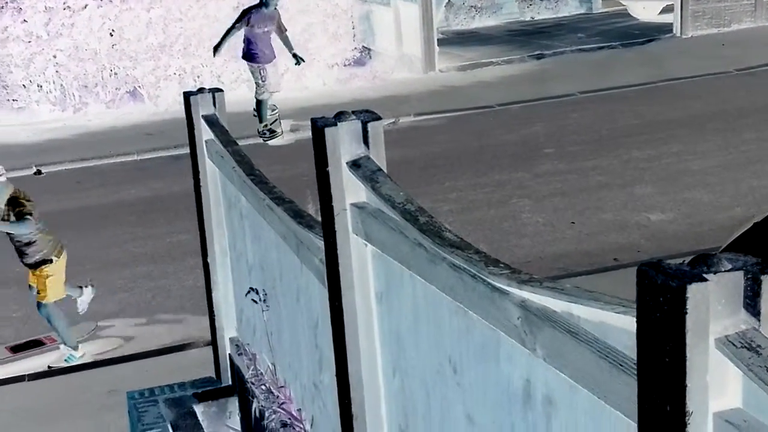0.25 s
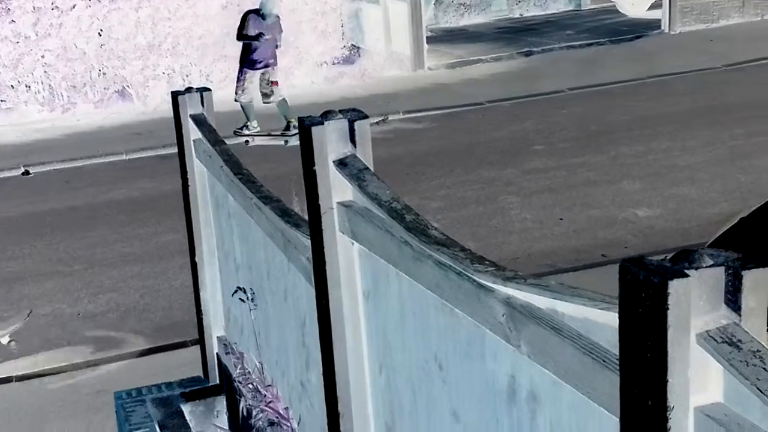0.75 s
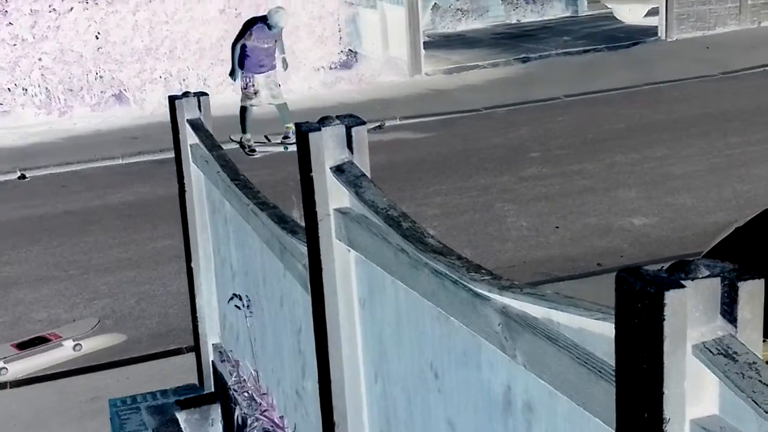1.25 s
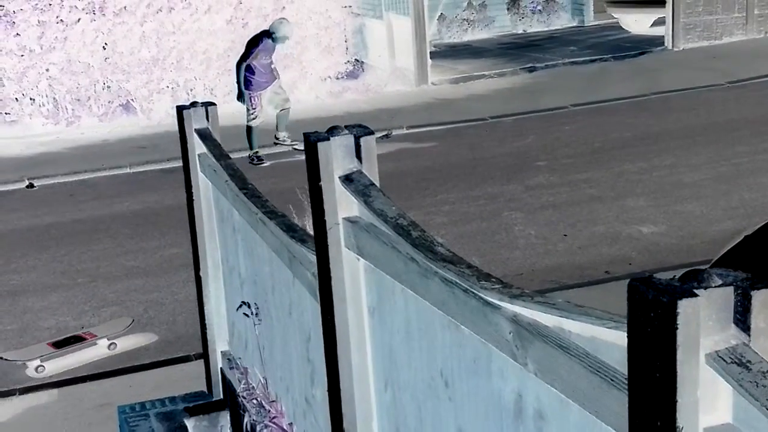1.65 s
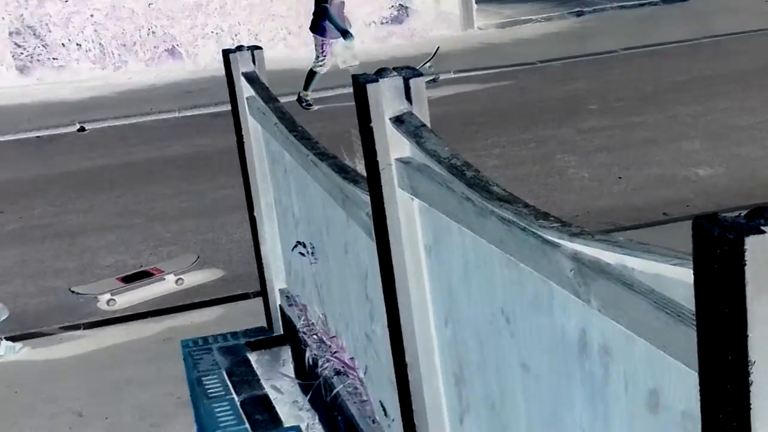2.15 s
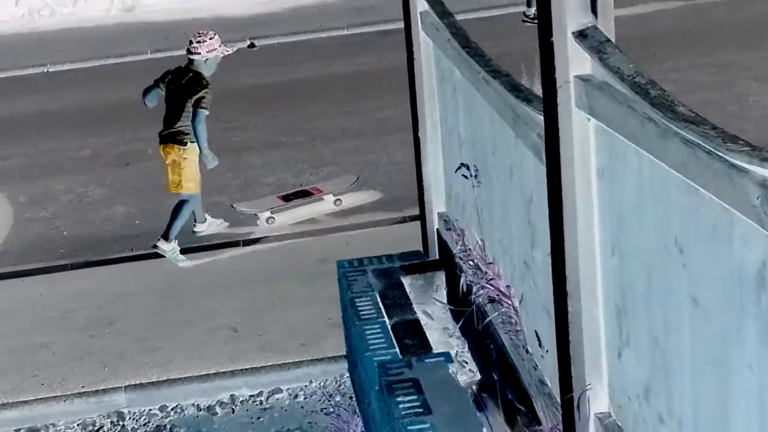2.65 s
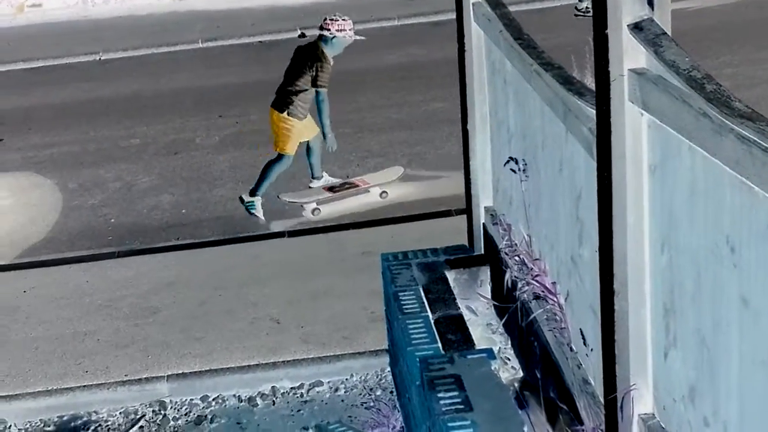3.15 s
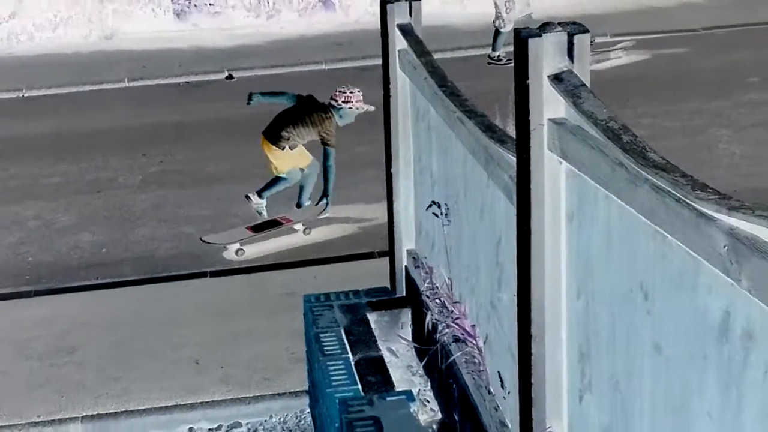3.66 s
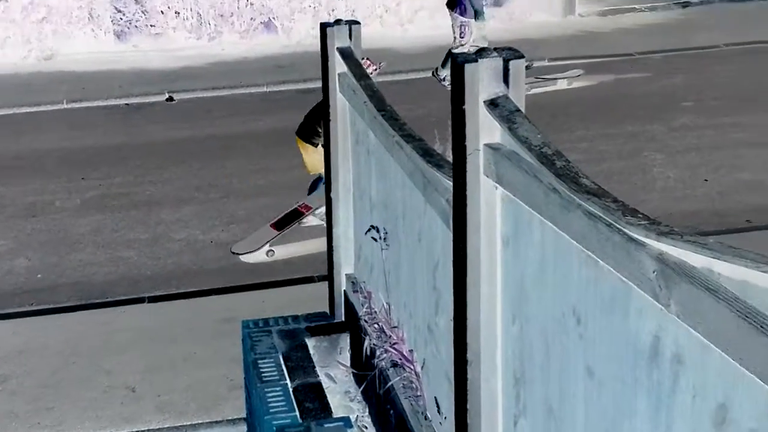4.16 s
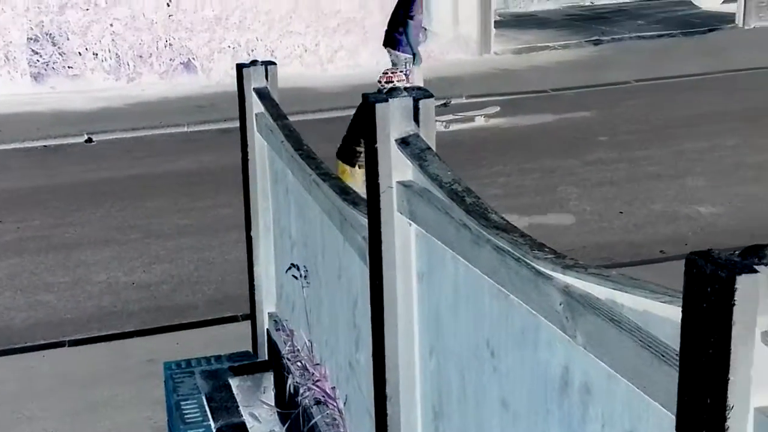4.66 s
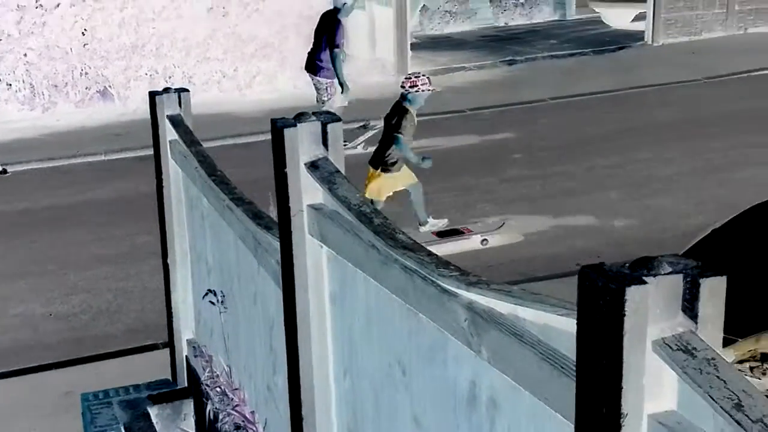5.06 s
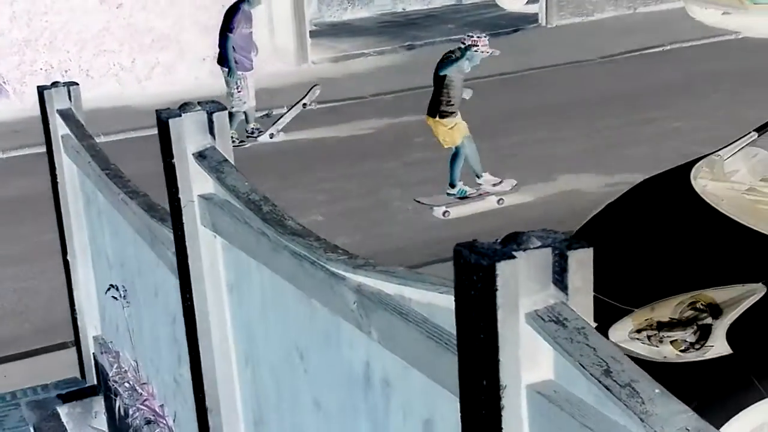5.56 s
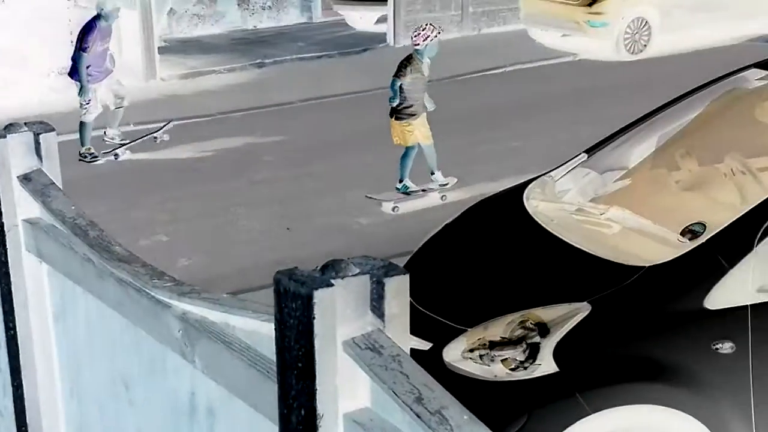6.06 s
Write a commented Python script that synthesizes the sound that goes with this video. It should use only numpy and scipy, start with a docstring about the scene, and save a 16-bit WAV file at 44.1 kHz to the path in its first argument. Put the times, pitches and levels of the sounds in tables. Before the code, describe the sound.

Skateboard wheels rumble and hiss over gritty asphalt with a brief chirping skid, hard board slams, wooden clacks, then more rolling and a final bright slam.

```python
"""Wheels rumble and hiss over grit in a quiet suburban hum; soon come knocks, a chirp and hard slams.
Two skateboards are on an asphalt street, heard from behind a garden fence a few metres away.
Rough contacts are bursts of shaped noise; boards ring as sets of fading tones, struck by tiny taps.
Chirps are wavering tones on a stuttering rasp; hum and drone are filtered noise.
The fence and the house fronts throw every sound but the hum and the dull thumps back as echoes."""
import sys
import numpy as np
from scipy import signal
from scipy.fft import rfft, irfft
from scipy.io import wavfile
from scipy.ndimage import uniform_filter1d

SR = 44100
rng = np.random.default_rng(int(sys.argv[2]) if len(sys.argv) > 2 else 0)


def store_pcm(level_fs):
    """Save levels as 16-bit WAV."""
    pcm = np.round(np.clip(level_fs, -1, 1) * 32767).astype(np.int16)
    wavfile.write(sys.argv[1], SR, np.atleast_2d(pcm).T)


N = 278271  # length in samples
T = np.arange(N) / SR  # time in seconds
BLOW_T = T[:SR // 3]  # time within one blow


def undb(db):
    """Turn decibels into a gain."""
    return 10 ** (np.asarray(db) / 20)


def unit(x):
    """Scale a steady sound to an rms (average strength) of 1."""
    return x / np.sqrt(np.mean(x ** 2))


def unit_blow(x):
    """Scale a blow to the energy of a fiftieth of a second at rms 1."""
    return x / np.sqrt(np.sum(x ** 2) * 50 / SR)


def add(track, s, x):
    """Mix x into the track from time s, in seconds."""
    start = int(s * SR)
    part = x[:max(N - start, 0)]
    track[start:start + len(part)] += part


def low_cut(x, hz):
    """Small bodies radiate little below hz."""
    return signal.sosfilt(signal.butter(3, hz, "high", fs=SR, output="sos"), x)


def colour(x, points, treble_db=0, bass_db=0, treble_hz=2800, bass_hz=520):
    """Filter through (f/Hz, level/dB) points, then lift or cut treble and bass; nothing sounds early."""
    size = 4096
    f = np.maximum(np.arange(size // 2 + 1) * SR / size, 1)
    hz, level_db = np.transpose(points)
    db = np.interp(np.log(f), np.log(hz), level_db)
    db = db + treble_db / (1 + (treble_hz / f) ** 4)
    db = db + bass_db / (1 + (f / bass_hz) ** 4)
    # folding the cepstrum puts the filter's energy as early as it can be
    cepstrum = irfft(np.log(undb(db)))[:size // 2]
    cepstrum[1:] *= 2
    response = irfft(np.exp(rfft(cepstrum, size)))
    return signal.fftconvolve(x, response)[:len(x)]


def walk(rate, count=N):
    """Wander smoothly towards a new chance value rate times a second; spread near 1."""
    hold = max(int(SR / rate), 1)
    steps = np.repeat(rng.standard_normal(count // hold + 1), hold)
    return np.sqrt(2) * uniform_filter1d(steps, hold)[:count]


def grit(count, spread_db):
    """Dense tiny impacts, a few of them much larger than the rest."""
    size_db = spread_db * np.minimum(rng.exponential(size=count), 6)
    return unit(rng.standard_normal(count) * undb(size_db))


def contact(rise, fall, spread_db):
    """Chatter of two rough surfaces that builds up and dies away."""
    build = np.minimum(BLOW_T / rise, 1)
    die_away = np.exp(-np.maximum(BLOW_T - rise, 0) / fall)
    return build * die_away * grit(len(BLOW_T), spread_db)


def drive(force, response):
    """What a body with this response gives out under the force."""
    return signal.fftconvolve(force, response)[:len(force)]


TAPS_PER_S = 620  # average rate of the tiny collisions within a blow


def taps(rise, fall):
    """A first touch, then tiny collisions at uneven gaps that die away."""
    happens = rng.random(len(BLOW_T)) < TAPS_PER_S / SR
    hits = contact(rise, fall, spread_db=1.5) * happens
    return np.r_[1, hits[1:]]


def ring(hz, t60):
    """One pure tone that fades by 60 dB in t60 seconds."""
    return np.sin(2 * np.pi * hz * BLOW_T) * np.exp(-np.log(1000) * BLOW_T / t60)


# no two blows meet the board at the same place or under the same load
PLACE_DB, LOAD_SHARE = 2.5, 0.02  # spread of each tone's level in dB, and of its pitch as a share


def modes(table, damping):
    """A board's own tones, weighted by where it is struck, detuned and damped by the rider's feet."""
    out = 0
    for hz, db, t60 in table:
        side, place, load = rng.standard_normal(3)
        tone = ring(hz * (1 + LOAD_SHARE * load), t60 / damping)
        out = out + np.sign(side) * undb(db + PLACE_DB * place) * tone
    return out


# low drone of distant traffic over time: (t/s, level/dB)
DRONE_LEVEL = [(0, -64), (1.3, -86), (1.7, -59), (2.6, -58), (3.3, -60), (3.9, -74), (6.31, -86)]
# tone colour of the drone: (f/Hz, level/dB)
DRONE_COLOUR = [(30, -29), (60, -14), (100, -2), (160, 2), (260, -16), (800, -59)]
# tone colour of the hum and faint hiss: (f/Hz, level/dB)
SUBURB_COLOUR = [(25, -26), (50, -17), (80, -14), (115, -7.5), (165, 1.5), (270, 3), (450, -7.5),
                 (1000, -7.5), (2500, -19.5), (6000, -27.5), (13500, -23.5), (15000, -36)]
SUBURB_DB = -52.4


def suburb():
    """Distant traffic and faint hiss, slowly swelling; a low drone comes and goes."""
    drone = unit(colour(rng.standard_normal(N), DRONE_COLOUR))
    drone_db = np.interp(T, *np.transpose(DRONE_LEVEL))
    hum = unit(colour(rng.standard_normal(N), SUBURB_COLOUR))
    hum_db = SUBURB_DB + 0.5 * walk(3.7)
    return undb(drone_db) * drone + undb(hum_db) * hum


# tones of the plywood deck with its metal trucks, before chance and damping: (f/Hz, level/dB, t60/s)
DECK = [(238, -6, 0.061), (300.7, 0.5, 0.35), (514, 10, 0.18), (590, -28, 0.059), (677, 12.5, 0.1),
        (825, 20.5, 0.072), (925, 9.5, 0.29), (987, -19, 0.22), (1120, -30, 0.095), (1224, 5.5, 0.4),
        (1394, 5.5, 0.28), (1484, 16.5, 0.061), (1730, -17, 0.15), (1870, 4.5, 0.38), (2178, 17.5, 0.076),
        (2290, 12.5, 0.15), (2820, -29, 0.085), (2960, -7, 0.055), (3300, -32.5, 0.089), (3630, -3, .10),
        (4030, 19, 0.015), (4130, -29, 0.11), (4530, -17, 0.082), (4900, 3, 0.19)]
STONES_PER_S = 110  # for each wheel


def stones():
    """Coarser stones knock the deck through one wheel."""
    hits = (rng.random(N) < STONES_PER_S / SR) * rng.uniform(-0.67, 1, N)
    through_wheel = [(150, -37.0), (240, -1.0), (320, 9), (600, 4.5), (1200, -11), (2000, -10.0), (4000, -6)]
    knock = colour(modes(DECK, damping=2.6), through_wheel)
    return unit(drive(hits, knock))


# tone colour of wheels on grit, before the bass and treble trims: (f/Hz, level/dB)
RUMBLE_COLOUR = [(59, -69), (100, -66), (147, -45), (177, -40), (237, -3), (269, -10.5), (318, -5),
                 (395, -6.5), (678, 2), (803, -1.5), (1010, -1), (1260, -10), (1940, -7), (2980, -12),
                 (4000, -16.5), (5200, -24), (8800, -120)]
PEBBLES_PER_S, PEBBLE_FALL_S = 65, 0.0023


def pebbles():
    """Small rattles at uneven gaps as the wheels hop over loose stones."""
    hops = (rng.random(N) < PEBBLES_PER_S / SR).astype(float)
    shake = drive(hops, np.exp(-BLOW_T / PEBBLE_FALL_S))
    return unit(colour(shake * grit(N, spread_db=2.0), RUMBLE_COLOUR, treble_db=-0.5, bass_db=-8.5))


# Ride levels, before the trims and the flutter: (t/s, rumble level/dB, hiss level/dB)
# the far rider, who coasts to a stop
FAR_RIDE = [(0, -30.5, -38), (0.2, -37, -46), (0.46, -30, -47.5), (0.68, -30.5, -55), (0.8, -39, -43.5),
            (0.91, -45, -52.5), (0.979, -24.5, -39), (1.2, -38, -45), (1.6, -37, -49), (1.9, -47.5, -64),
            (3.3, -54, -64.5)]
# the near board is stepped on, tipped up and dragged round
NEAR_TURN = [(3.3, -51, -63), (3.36, -29, -59), (3.46, -40.5, -62), (3.62, -36, -58), (3.82, -36.5, -54),
             (4.05, -35.5, -45), (4.28, -39.5, -44.5), (4.41, -47.5, -63)]
# the near rider pushes off
NEAR_RIDE = [(4.413, -33, -40.5), (4.55, -39.5, -44), (4.85, -35, -38.5), (5.0, -36, -42),
             (5.3, -37.5, -44), (5.44, -35, -43), (5.53, -30.5, -39), (5.59, -33.5, -43), (5.73, -37, -43),
             (5.81, -32, -37), (5.87, -31.5, -40), (5.96, -28.5, -36.5), (6.0, -31.5, -40),
             (6.12, -32, -40), (6.17, -40.5, -47.5), (6.23, -34.5, -46), (6.31, -37, -29)]
# tone colour of the hiss: (f/Hz, level/dB)
HISS_COLOUR = [(1760, -31), (3000, -26), (3800, -3.5), (4840, 4), (6080, -6), (9880, -11.5), (13000, -26.5),
               (15000, -53)]
RUMBLE_TRIM_DB, HISS_TRIM_DB = -6, -2
BOARD_DB, PEBBLE_DB = -7.0, -8.5  # against the tread
GRAINS_PER_S, GRAIN_S, GRAIN_DB = 110, 0.0011, -7.5  # sand cracking under the wheels; level against the grit


def wheels():
    """Asphalt grain shakes wheels and deck; the uneven road makes the rumble and hiss flutter."""
    s, *columns = np.transpose(FAR_RIDE + NEAR_TURN + NEAR_RIDE)
    rumble_db, hiss_db = (np.interp(T, s, column) for column in columns)
    road_db = 1.0 * walk(50) + 1.2 * walk(14)

    tread = colour(grit(N, spread_db=3.5), RUMBLE_COLOUR, treble_db=-5.0, bass_db=-1.5)
    tread = unit(low_cut(tread, hz=128))
    board = unit(sum(stones() for wheel in range(4)))
    rumble = tread + undb(BOARD_DB) * board + undb(PEBBLE_DB) * pebbles()
    rumble_db = rumble_db + RUMBLE_TRIM_DB + road_db + 1.0 * walk(140)

    grains = (rng.random(N) < GRAINS_PER_S / SR) * rng.exponential(size=N)
    sand = unit(drive(grains, np.exp(-BLOW_T / GRAIN_S)) * rng.standard_normal(N))
    hiss = unit(colour(grit(N, spread_db=3.5) + undb(GRAIN_DB) * sand, HISS_COLOUR))
    hiss_db = hiss_db + HISS_TRIM_DB + road_db + 0.89 * walk(180)
    return undb(rumble_db) * rumble + undb(hiss_db) * hiss


# tone colour of a dry crack on the road: (f/Hz, level/dB)
CRACK_COLOUR = [(35, -56), (100, -42), (230, -4), (420, -3.5), (600, 3.5), (1200, 0.5), (2000, 1),
                (2900, -4.5), (4600, -9), (6400, -19), (10000, -25.5), (15000, -76)]
TAP_S, RATTLE_S, RATTLE_DB = 0.00075, 0.088, -11  # fade of one tap, fade of the rattle, its level
CLUSTERS_PER_S, CLUSTER_DB = 265, 1.5  # the chatter of a blow comes in bunches
STRONG_T60_S, LINGER_T60_S, LINGER_DB = 0.044, 0.27, -18  # the strongest ring drops fast, then lingers


def blow(rise, fall, treble_db, bass_db, hz, ring_db):
    """A rattling crack, the ring of the whole board, and one tone that every tap strikes afresh."""
    # loose trucks and bearings chatter on after the blow itself
    rattle = drive(np.abs(taps(rise, RATTLE_S)) ** 1.08, np.exp(-BLOW_T / TAP_S))
    rattle = unit_blow(rattle * rng.standard_normal(len(BLOW_T)))
    bunches = undb(CLUSTER_DB * walk(CLUSTERS_PER_S, count=len(BLOW_T)))
    chatter = unit_blow(bunches * contact(rise, fall, spread_db=1.5))
    crack = unit_blow(colour(chatter + undb(RATTLE_DB) * rattle, CRACK_COLOUR))

    build = np.minimum(BLOW_T / rise, 1)
    body = unit_blow(low_cut(build * modes(DECK, damping=2.18), hz=178))
    # bare wood hits bright, a wheel or a sole hits dull
    flat = [(20, 0), (SR / 2, 0)]
    whole = unit_blow(colour(crack + undb(-3.0) * body, flat, treble_db, bass_db))

    tone = ring(hz, STRONG_T60_S) + undb(LINGER_DB) * ring(hz, LINGER_T60_S)
    strongest = build * drive(taps(rise, 0.77 * fall), tone)
    strongest = unit_blow(low_cut(strongest, hz=214))
    return unit_blow(whole + undb(ring_db) * strongest)


# trucks knocking as a foot lands or the weight shifts:
# (t/s, level/dB, die-away/s, brightness/dB, strongest ring f/Hz, ring level/dB)
KNOCKS = [(0.247, -32, 0.0041, -16, 830, 1.5), (0.543, -27, 0.0066, -5, 896, 1),
          (0.578, -27, 0.065, -12, 596, -28), (0.737, -23.5, 0.002, -13, 1450, 1),
          (0.7603, -23.5, 0.0037, -10, 1048, 6), (1.074, -20.5, 0.01, 2.5, 596, -10),
          (1.259, -29.5, 0.033, -6.5, 676, -23), (1.349, -37.5, 0.003, 4, 2320, 2),
          (1.414, -26.5, 0.015, 1.5, 1670, -4), (1.5169, -28, 0.018, 10, 2255, -11),
          (1.524, -27.5, 0.006, 2, 1480, -2), (1.62, -39.5, 0.017, -1, 640, -11),
          (1.708, -30.5, 0.029, -2, 1600, -7), (1.749, -32.5, 0.024, 2, 1285, -8),
          (2.675, -38.5, .008, -4, 876, 3), (3.334, -27, 0.024, -4, 880, -17),
          (3.37, -32.5, .014, -4.5, 1510, -7), (3.412, -41, 0.007, -8, 1730, -3),
          (3.502, -33, 0.053, 1, 1010, -14), (3.581, -25, 0.018, -7, 514, -9),
          (3.692, -25, 0.0034, 13, 1330, -3), (3.803, -31, 0.022, 4, 1830, -8),
          (3.881, -25, 0.025, 9.5, 2212, 0.5), (3.901, -36, 0.0058, 8, 2400, 2),
          (3.917, -36, 0.0048, 7, 1476, 5), (3.935, -33.5, 0.013, 4, 2140, 2),
          (4.114, -32.5, 0.06, -20, 434, -10), (4.219, -36.5, 0.043, -16, 447, 0),
          (4.266, -35.5, 0.016, -14, 605, 1), (4.358, -43.5, 0.0026, -8, 1800, -10),
          (4.4143, -34, 0.02, -16, 630, -16), (4.429, -28.5, 0.012, -14.5, 1020, -5),
          (4.483, -30.5, 0.026, -6, 1030, -7), (4.579, -32, 0.02, -14, 1090, -6),
          (4.707, -33, 0.0052, 3, 2060, 5), (4.751, -38, 0.017, -3, 1940, -7),
          (4.824, -24.5, 0.04, -2.5, 1160, -24), (4.895, -32.5, 0.022, -3, 590, -7),
          (5.019, -35.5, 0.0065, -3, 1800, -1), (5.075, -40.5, 0.01, -1, 1890, 2),
          (5.138, -36, 0.027, -7, 650, 5), (5.232, -39, 0.0079, -5, 785, 2),
          (5.304, -35.5, 0.016, 10, 1930, -2), (5.4992, -31.5, 0.007, -8, 900, 1),
          (5.524, -45, .015, -7, 800, -12), (5.7836, -34.5, 0.0016, -3, 790, -14),
          (5.812, -33, 0.013, -5, 1030, 6), (6.2541, -18.5, 0.0081, 34, 1854, 2.5)]
KNOCK_RISE_SHARE = 0.15  # build-up as a share of the die-away
KNOCK_BASS_DB, BASS_PER_BRIGHT = -2.5, 1  # bass at neutral brightness; dB lost per dB of brightness


def knocks():
    """Lighter blows: the longer ones build up more slowly, the duller ones carry more bass."""
    out = np.zeros(N)
    for s, db, fall, bright_db, hz, ring_db in KNOCKS:
        bass_db = KNOCK_BASS_DB - BASS_PER_BRIGHT * bright_db
        knock = blow(KNOCK_RISE_SHARE * fall, fall, bright_db, bass_db, hz, ring_db)
        add(out, s, undb(db) * knock)
    return out


# urethane wheels chirping sideways: (t/s, length/s, middle pitch f/Hz, level/dB)
CHIRPS = [(0.33, 0.013, 1587, -31.5), (0.379, 0.0073, 1830, -35), (0.382, 0.013, 1440, -24),
          (0.411, 0.015, 1430, -22), (0.438, 0.018, 1498, -25.5), (0.449, .01, 2160, -32)]
# the skid that carries the chirps: (t/s, level/dB)
SKID_LEVEL = [(.325, -60), (.34, -31.5), (.365, -55), (.39, -32), (.42, -35), (.45, -37), (.465, -39),
              (.495, -43), (.52, -62)]
# tone colour of the skid: (f/Hz, level/dB)
RASP_COLOUR = [(900, -34), (1400, 2), (1800, 8), (2200, -6), (2900, -34), (3800, -30), (4800, -10),
               (5800, -21), (15000, -53)]
SLIP_HZ, SLIP_JITTER = 150, 0.36  # middle rate of the stutter, and its unevenness as a share
UPPER_RATIO, UPPER_DB = 1.42, -16.5  # a second, wavering tone of the wheel
OVERTONE_DB = -42


def chirps():
    """A wheel sticks and slips sideways: a stuttering rasp that catches into short wavering tones."""
    turns = np.cumsum(SLIP_HZ * (1 + SLIP_JITTER * walk(200))) / SR
    stutter = np.exp(-(turns % 1) / 0.44)
    rasp = unit(colour(grit(N, spread_db=4.5) * stutter, RASP_COLOUR))
    # silent outside the skid
    out = rasp * undb(np.interp(T, *np.transpose(SKID_LEVEL), left=-np.inf, right=-np.inf))
    for s, length, hz, db in CHIRPS:
        count = int(length * SR)
        phase = 2 * np.pi * np.cumsum(hz * (1 + 0.034 * walk(490, count=count))) / SR
        overtones = np.sin(2 * phase) + np.sin(3 * phase)
        upper = walk(420, count=count) * np.sin(UPPER_RATIO * phase)
        tone = np.sin(phase) + undb(UPPER_DB) * upper + undb(OVERTONE_DB) * overtones
        squeal = unit(tone * undb(2.1 * walk(440, count=count)))
        add(out, s, undb(db) * signal.windows.tukey(count, 0.4) * squeal)
    return out


# sand grains bursting under a wheel, a sole or the tail: (t/s, level/dB)
SNAPS = [(0.34, -46), (0.3708, -44.5), (0.3882, -46), (0.5238, -41), (.7118, -38), (0.72, -35),
         (.9345, -38), (1.1037, -36), (1.1425, -37.5), (1.448, -45.5), (3.6972, -24), (3.709, -32),
         (4.125, -41), (4.26, -45), (4.6465, -34.5), (5.955, -41.5)]
# tone colour of a bursting grain: (f/Hz, level/dB)
SNAP_COLOUR = [(300, -48), (2500, -23), (4700, 13), (7000, -0.5), (10500, -5.5), (15000, -24.5)]
SNAP_RISE_S, SNAP_FALL_S = 0.00033, 0.00066


def snaps():
    """Single bright ticks of crushed sand, each a very short burst of noise."""
    out = np.zeros(N)
    for s, db in SNAPS:
        tick = colour(contact(SNAP_RISE_S, SNAP_FALL_S, spread_db=3.5), SNAP_COLOUR)
        add(out, s, undb(db) * unit_blow(tick))
    return out


# soles and wheels scraping the grit: (t/s, level/dB, die-away/s, treble level/dB)
SCUFFS = [(0.509, -26, 0.052, 1), (0.631, -36, 0.029, 13), (0.710, -27, 0.028, 2), (1.128, -39, 0.016, 19),
          (2.135, -42, 0.065, -14), (2.382, -47.5, 0.014, 0), (2.643, -48.5, 0.04, -2),
          (2.666, -38.5, 0.022, 2), (2.922, -49.5, 0.021, -2), (3.121, -51.5, 0.014, -2),
          (3.318, -39.5, .025, -20), (4.125, -43.5, 0.024, 13), (4.259, -36.5, 0.017, 24),
          (6.243, -33.5, 0.012, -11)]
# tone colour of a scuff: (f/Hz, level/dB)
SOLE_COLOUR = [(59, -53), (100, -27), (345, -2.5), (462, -1), (904, -2.5), (1290, -3), (2750, -8.5),
               (4840, -4), (5960, -13.5), (10700, -19), (15000, -76)]
SCUFF_RISE_SHARE = 0.29  # build-up as a share of the die-away


def scuffs():
    """Short gritty scrapes: rough noise that builds up and dies away."""
    out = np.zeros(N)
    for s, db, fall, treble_db in SCUFFS:
        scrape = contact(SCUFF_RISE_SHARE * fall, fall, spread_db=2.0)
        add(out, s, undb(db) * unit_blow(colour(scrape, SOLE_COLOUR, treble_db)))
    return out


# tail or whole board slammed on the road: (t/s, level/dB, build-up/s, die-away/s, treble level/dB,
# bass level/dB, strongest ring f/Hz, ring level/dB, rebound delay/s, rebound level against the slam/dB)
SLAMS = [(0.7205, -14.5, 0.0038, 0.011, -13.5, -3, 1254, -10.5, 0.035, -6),
         (0.932, -12, 0.00088, 0.0074, 8.5, -1, 2287, -10, 0.024, -10.5),
         (1.0684, -18, 0.00021, 0.0018, 0.5, 4, 900, -3, 0.0065, -9),
         (2.1642, -28.5, 0.0016, 0.0026, -7.5, -10, 460, -4.5, .008, -18),
         (3.696, -11, 0.0082, 0.016, 7, -7, 1823, -5, .042, -10.5),
         (4.645, -17, 0.0023, 0.025, 1.5, -8, 580, -10.5, 0.022, -21),
         (6.258, -11, 0.0043, 0.017, -1, -13.5, 1345, 3, 0.046, -5.5)]
# the other end of the board comes down just after each slam, more softly
REBOUND_RISE_S, REBOUND_FALL_S, REBOUND_TREBLE_DB = 0.0029, 0.014, -11.5


def slams():
    """The board hits the road hard, one end after the other; the second blow is softer and duller."""
    out = np.zeros(N)
    for s, db, rise, fall, treble_db, bass_db, hz, ring_db, lag, rebound_db in SLAMS:
        first = blow(rise, fall, treble_db, bass_db, hz, ring_db)
        add(out, s, undb(db) * first)
        dull_db = treble_db + REBOUND_TREBLE_DB
        rebound = blow(REBOUND_RISE_S, REBOUND_FALL_S, dull_db, bass_db, hz, ring_db)
        add(out, s + lag, undb(db + rebound_db) * rebound)
    return out


# bare wood clacking on the road: (t/s, level/dB, die-away/s, pitch ratio, treble level/dB)
CLACKS = [(0.966, -24.5, .004, 0.98, 5), (1.272, -38.5, .005, 0.99, 17), (1.447, -43, .004, 0.95, 2),
          (2.671, -40, 0.01, 1.03, 4), (2.7106, -30.5, 0.0059, 0.86, 4.5), (2.723, -29.5, 0.0088, 0.95, 4),
          (3.478, -33, 0.002, 1.13, -11), (3.485, -28, 0.012, 1.08, -4), (3.533, -38.5, 0.0061, 1, 2),
          (3.565, -28.5, 0.013, .97, -3), (3.748, -26, 0.0053, 0.85, 3), (3.884, -37, 0.0057, 0.84, -8)]
# tones of a bare plywood nose or tail, before pitch ratio, chance and damping: (f/Hz, level/dB, t60/s)
PLYWOOD = [(492, -1, 0.13), (696, -3, 0.096), (888, 6.5, 0.036), (983, 5.5, 0.047), (1250, -7, 0.044),
           (1600, 5, 0.041), (2000, -22, 0.019), (2820, -4, 0.06), (3100, -8, .045), (3130, -8, 0.034),
           (3450, -1.5, 0.034), (3980, -6, 0.022), (4420, -10, 0.042)]
CLACK_RISE_S, CLACK_CRACK_DB = 0.0018, -9  # build-up; level of the crack against the wood


def clacks():
    """The wooden tip chatters on the asphalt: a dry crack and a short, high ring."""
    out = np.zeros(N)
    tilt = [(100, 7), (400, -8), (5000, 5.5), (7000, -1.5)]
    for s, db, fall, pitch, treble_db in CLACKS:
        tuned = [(hz * pitch, mode_db, t60) for hz, mode_db, t60 in PLYWOOD]
        wood = unit_blow(drive(taps(CLACK_RISE_S, fall), modes(tuned, damping=1.26)))
        crack = unit_blow(colour(contact(CLACK_RISE_S, fall, spread_db=1.5), CRACK_COLOUR))
        clack = colour(wood + undb(CLACK_CRACK_DB) * crack, tilt, treble_db)
        add(out, s, undb(db) * unit_blow(low_cut(clack, hz=260)))
    return out


# dull low thumps: (t/s, f/Hz, level/dB)
BUMPS = [(1.0695, 250, -30), (1.622, 151, -47), (1.636, 290, -58), (2.128, 254, -48.5), (2.166, 270, -38),
         (3.044, 203, -38), (3.062, 330, -40), (3.075, 125, -42.5), (3.105, 211, -47)]


def bumps():
    """Dull thumps: a low tone that swells and fades within a few cycles."""
    out = np.zeros(N)
    for s, hz, db in BUMPS:
        thump = low_cut(BLOW_T * ring(hz, t60=0.024), hz=135)
        add(out, s, undb(db) * unit_blow(thump))
    return out


# the wooden tip dragged over the asphalt:
# (t/s, length/s, level/dB, treble level/dB, groan start f/Hz, groan end f/Hz)
SCRAPES = [(1.396, 0.024, -33.5, -10, 763, 643), (1.451, 0.035, -36.5, -7, 1033, 844),
           (1.548, 0.036, -32.5, -14, 1337, 850), (3.48, 0.025, -33, -7, 1160, 923),
           (3.55, 0.0445, -29, -4, 1275, 927), (3.59, .055, -32, -15, 996, 833),
           (4.562, 0.03, -32.5, -1, 1000, 1295)]
JUDDER_PER_S, JUDDER_DB = 360, 0.5
GROAN_DB, GROAN_WIDTH_HZ = -3, 360  # level against the rasp; rate of the wander that broadens the groan


def scrapes():
    """Wood judders over the road: a dry rasp and a broad groan that slides as the load shifts."""
    out = np.zeros(N)
    for s, length, db, treble_db, start_hz, end_hz in SCRAPES:
        count = int(length * SR)
        judder = undb(JUDDER_DB * walk(JUDDER_PER_S, count=count))
        rasp = unit(colour(grit(count, spread_db=3.5), CRACK_COLOUR, treble_db, bass_db=1))
        phase = 2 * np.pi * np.cumsum(np.linspace(start_hz, end_hz, count)) / SR
        groan = unit(walk(GROAN_WIDTH_HZ, count=count) * np.sin(phase))
        drag = unit(judder * (rasp + undb(GROAN_DB) * groan))
        add(out, s, undb(db) * signal.windows.tukey(count, 0.25) * drag)
    return out


HOUSE_ECHO_S, HOUSE_SMEAR_S = 0.063, 0.011  # delay and fade of the house echo
NEAR_DB, HOUSE_DB, TAIL_DB = -10.0, -22, -16.5  # house and tail are coloured after this


def street(x):
    """Fence and kerb answer within milliseconds; house fronts give one smeared echo and a thin tail."""
    t = T[:SR]
    near = grit(SR, spread_db=0.5) * np.exp(-t / 0.015) * (t > 0.006)
    house_shape = np.exp(-np.abs(t - HOUSE_ECHO_S) / HOUSE_SMEAR_S) * (t > HOUSE_ECHO_S)
    house = grit(SR, spread_db=3.5) * house_shape
    tail_shape = np.exp(-np.log(1000) * t / 0.59) * np.minimum(t / 0.048, 1)
    tail = grit(SR, spread_db=3.5) * tail_shape
    far = undb(HOUSE_DB) * unit(house) + undb(TAIL_DB) * unit(tail)
    far = colour(far, [(100, 6.5), (600, -3.5), (1400, 5.5), (2300, 2.0), (5000, 0.5), (12000, -7.0)])
    echoes = (undb(NEAR_DB) * unit(near) + far) / np.sqrt(SR)
    return x + signal.fftconvolve(x, echoes)[:N]


def scene():
    """Both boards in the street, the same in both ears; thumps and hum get no echo."""
    rolling = wheels() + chirps()
    blows = knocks() + slams() + clacks()
    grinding = snaps() + scuffs() + scrapes()
    sound = street(rolling + blows + grinding) + bumps() + suburb()
    return np.array([sound, sound])


TOP_HZ = 15000


def record(dry):
    """Flatten peaks at full scale, then cut the treble above TOP_HZ with a steep filter."""
    top_cut = signal.ellip(8, 0.2, 70, TOP_HZ, fs=SR, output="sos")
    return signal.sosfilt(top_cut, np.clip(dry, -1, 1))


dry = scene()
out = record(dry)
store_pcm(out)
```